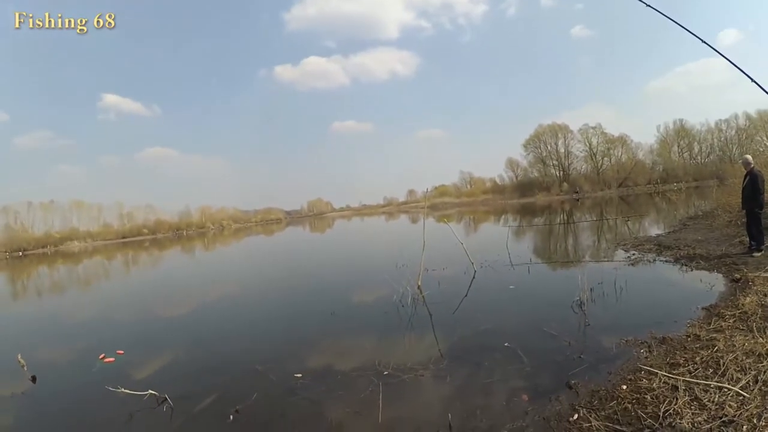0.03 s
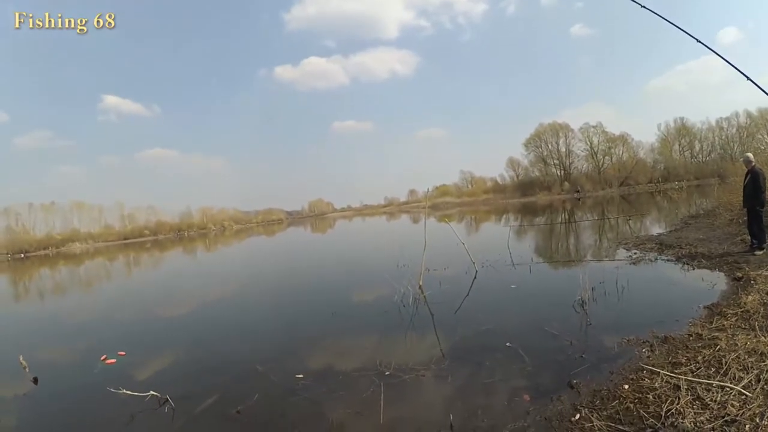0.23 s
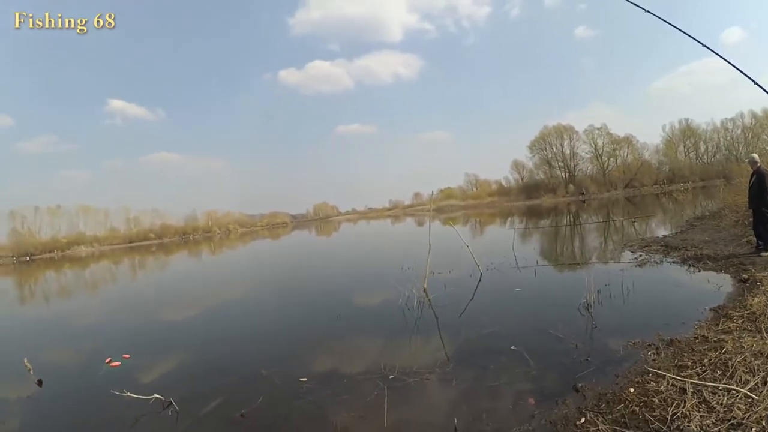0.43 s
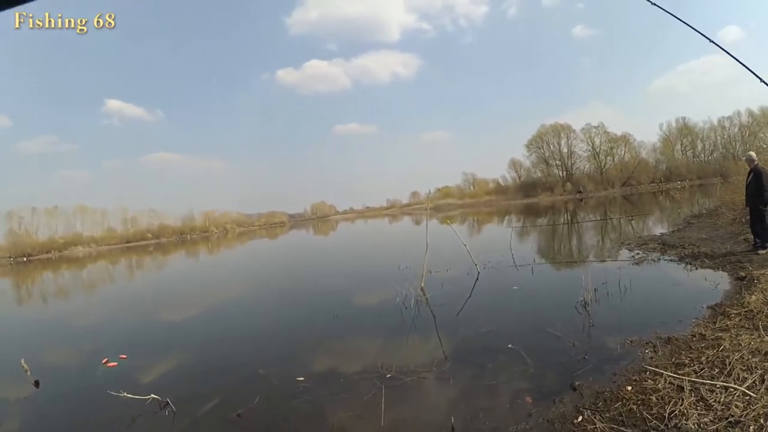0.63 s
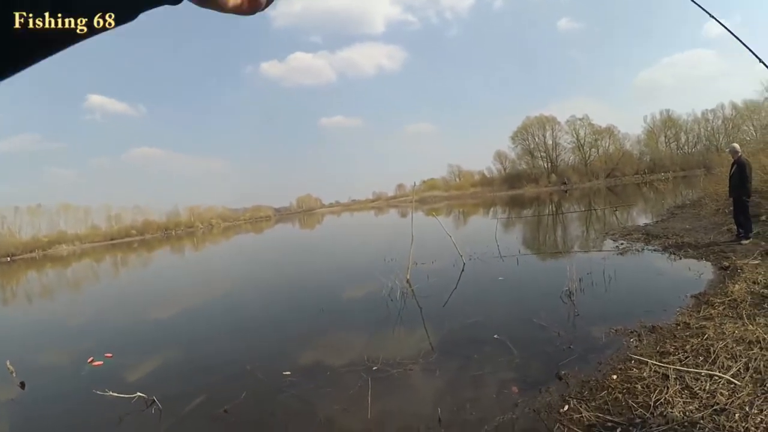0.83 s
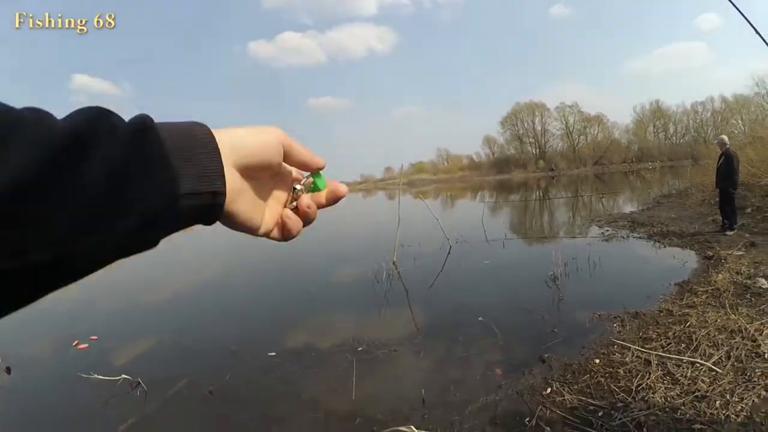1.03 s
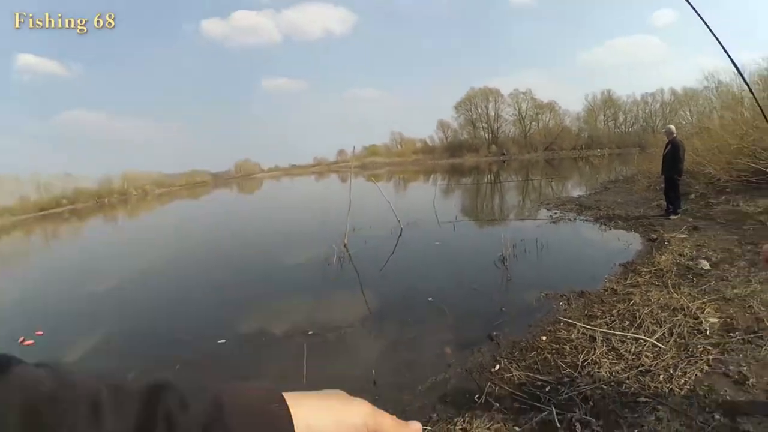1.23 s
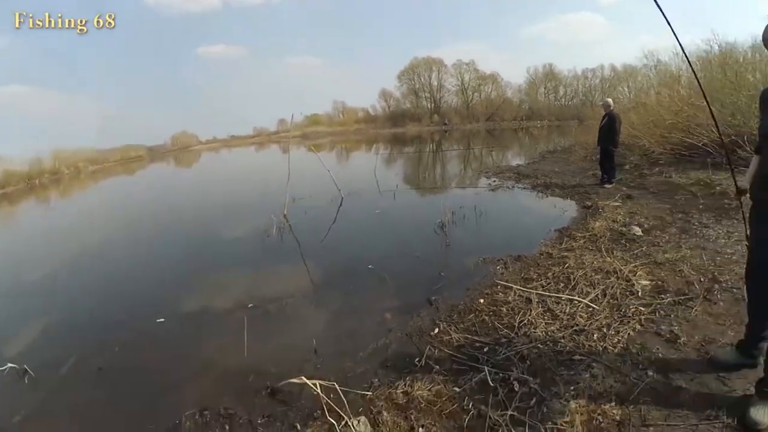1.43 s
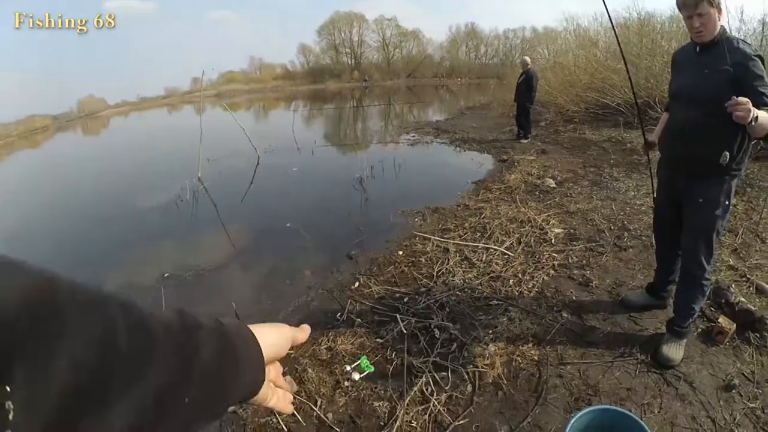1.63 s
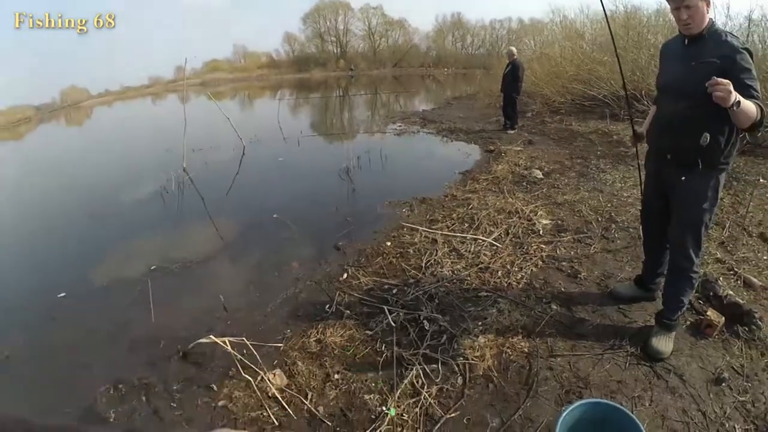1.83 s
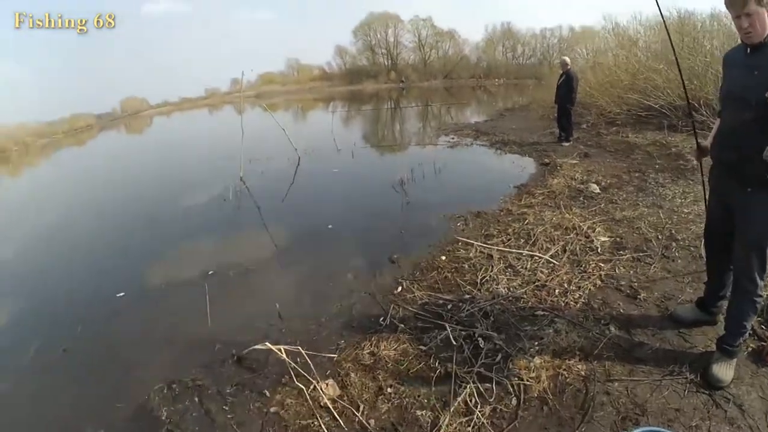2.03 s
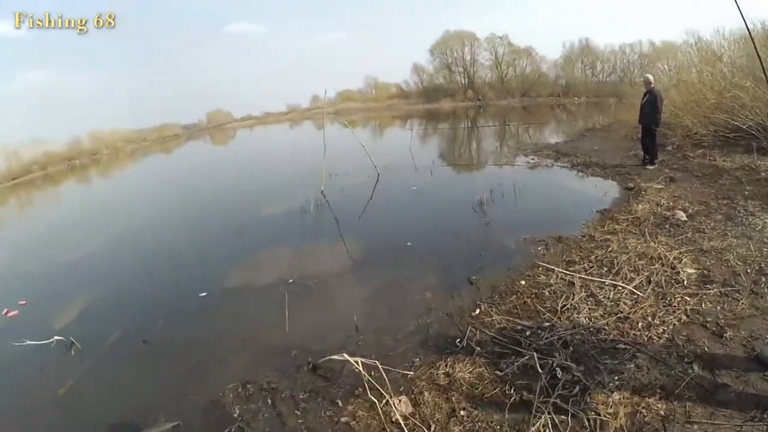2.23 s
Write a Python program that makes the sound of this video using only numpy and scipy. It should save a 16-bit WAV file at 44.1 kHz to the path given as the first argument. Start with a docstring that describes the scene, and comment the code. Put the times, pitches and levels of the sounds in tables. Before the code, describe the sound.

Bright metallic jingling comes from a little bell handled up close in a quiet outdoor spot. It rattles twice, its ring cut short by fingers, tinkles sparsely, then falls with a clack and a few last clinks.

```python
"""Twin fishing bell by a pond

A hand-held twin bell gives two shakes, a few loose tinkles, then a sharp clack as it drops.
Pellets excite the modes of two small shells, which also clack together; the fingers damp the ringing.
A sleeve scuffs, a faint swish rises and air nudges the microphone.
A regularly slipping sample clock modulates the sound, putting faint side tones around every ring."""
import sys
import numpy as np
from scipy import signal
from scipy.fft import rfft, irfft
from scipy.io import wavfile
from scipy.ndimage import uniform_filter1d, map_coordinates

SR = 44100
rng = np.random.default_rng(int(sys.argv[2]) if len(sys.argv) > 2 else 0)


def unload_audio(sound):
    """Save the sound as a 16-bit wav file, at the path given as the first command line argument."""
    columns = np.transpose(np.atleast_2d(sound))
    # keep every value between -1 and 1, then stretch to whole-number steps
    steps = np.round(np.clip(columns, -1, 1) * 32767)
    wavfile.write(sys.argv[1], SR, steps.astype(np.int16))


N = 101429

# Pellet strikes on the lower shell: start_s, ring_db, overtone_db
LOW_STRIKES = [(0.2166, -25.5, -38), (0.2234, -18.5, -39.5), (0.236, -45, -35), (0.25, -33.5, -27),
               (0.2662, -21, -26), (0.2814, -17.5, -22), (0.2965, -20.5, -24.5), (0.3567, -34, -27.5),
               (0.374, -39.5, -32), (0.414, -51, -43), (0.4827, -51.5, -46.5), (0.5, -69, -55),
               (0.881, -34.5, -40), (0.914, -46.5, -34), (0.931, -32.5, -34), (0.9437, -25, -36),
               (0.955, -30, -25.5), (1.0013, -43, -35.5), (1.021, -29.5, -45), (1.0305, -25, -41),
               (1.071, -34, -34), (1.094, -25, -35.5), (1.1167, -29.5, -45), (1.1714, -37, -50.5),
               (1.3459, -43, -45.5), (1.6317, -49.5, -43), (1.72, -41, -49), (1.8105, -51, -54.5),
               (1.8375, -61.0, -59.5), (1.9384, -49.5, -57.5), (2.06, -40.5, -48), (2.202, -51.5, -39),
               (2.2235, -41.5, -48.5), (2.2706, -44.0, -49.5)]
# Pellet taps inside the closed hand: start_s, level_db
MUFFLED_TAPS = [(0.0278, -33.5), (0.049, -42), (0.0908, -33), (0.0955, -44.5), (0.1122, -36.5),
                (0.1398, -35.5), (0.1651, -36.5), (0.1833, -50)]
LOW_HZ, LOW_OVERTONE_HZ = 3775, 9158
LOW_GAIN_DB, OVERTONE_GAIN_DB = 2, 1

def low_bell():
    """Impact excitation: a struck shell rings at its natural frequencies; gripped, it only taps."""
    starts, ring_db, overtone_db = np.array(LOW_STRIKES).T
    taps = shell_mode(*np.array(MUFFLED_TAPS).T, LOW_HZ)
    ring = shell_mode(starts, ring_db + LOW_GAIN_DB, LOW_HZ)
    overtone = shell_mode(starts, overtone_db + OVERTONE_GAIN_DB, LOW_OVERTONE_HZ, overtone=True)
    return taps + ring + overtone


# Pellet strikes on the higher shell: start_s, ring_db, overtone_db, overtone_hz
HIGH_STRIKES = [(0.2243, -30.5, -31.5, 10380), (0.2572, -34, -20.5, 10260), (0.2667, -42.5, -38, 10270),
                (0.2823, -21.5, -29.5, 10430), (0.2875, -22, -21.5, 10360), (0.2967, -22.5, -18.0, 10390),
                (0.3071, -30.5, -32, 10080), (0.725, -76.5, -49.5, 10350), (0.8671, -27, -45, 10560),
                (0.881, -30.5, -45, 10330), (0.9063, -29.5, -48, 10300), (0.9229, -26.5, -30.5, 10590),
                (0.9506, -26.5, -40, 10300), (0.9564, -20.5, -35.5, 10320), (0.979, -40, -38.5, 10610),
                (0.9934, -29, -42, 10600), (1.021, -39, -36, 10310), (1.0437, -24.5, -36, 10600),
                (1.0574, -29, -38.5, 10110), (1.074, -18.5, -47, 10130), (1.093, -25.0, -35, 10080),
                (1.1161, -61, -45.5, 10280), (1.149, -38.5, -50.5, 10160), (1.326, -45, -79, 10400),
                (1.3391, -37.5, -60, 10320), (1.3562, -27.5, -45.5, 10160), (1.6055, -44, -85, 10350),
                (1.649, -32, -50.5, 10080), (1.6907, -32.5, -55, 10510), (1.761, -48.5, -55, 10520),
                (1.8395, -43.5, -61, 10500), (1.949, -54, -54, 10220), (1.999, -67, -49.5, 10210),
                (2.058, -34.0, -39.5, 10260), (2.0751, -29, -47.5, 10030), (2.1333, -42.0, -55.5, 10160),
                (2.1717, -45.5, -41.5, 10570)]
# Strength of the twin mode, added to ring_db: time_s, offset_db
TWIN_BALANCE = [(.95, -14), (1.04, -6), (1.65, -21), (1.69, 0.5), (1.77, 2), (1.83, -15.5)]
HIGH_HZ, TWIN_HZ, HIGH_GAIN_DB = 4143, 3980, 1.5

def high_bell():
    """Beating: two nearby modes interfere. The point of impact selects one of a cluster of overtones."""
    starts, ring_db, overtone_db, overtone_hz = np.array(HIGH_STRIKES).T
    twin_db = ring_db + np.interp(starts, *np.array(TWIN_BALANCE).T)
    ring = shell_mode(starts, ring_db + HIGH_GAIN_DB, HIGH_HZ)
    twin = shell_mode(starts, twin_db, TWIN_HZ)
    overtone = shell_mode(starts, overtone_db + OVERTONE_GAIN_DB, overtone_hz, overtone=True)
    return ring + twin + overtone


# Decay time of the shells, short while gripped: time_s, t60_s
RING_DECAY = [(.17, 0.015), (.222, 0.062), (.285, .15), (.33, 0.1), (.39, 0.024), (.87, .15), (1.13, 0.096),
              (1.2, 0.03103), (1.34, .1), (1.375, 0.01986), (1.64, .12), (1.95, 0.21), (2.12, 0.11),
              (2.25, .15)]
OVERTONE_FREE_T60_S, OVERTONE_GRIP_SHARE = 0.091, 0.25
GRIP_SHARPEN_S = 0.0005  # times the grip gives the fractional rise in pitch
RATTLE_HZ, RING_RATTLE_DB, OVERTONE_RATTLE_DB = 150, -19, -11
DETUNE, JOLT_RAD, CONTACT_S = 0.0018, 1.58, 0.00045

def shell_mode(starts, levels_db, hz, overtone=False):
    """Damped oscillator, restarted by each strike. Fingers damp and sharpen it; the pellet buzzes on it."""
    t = np.arange(N) / SR
    grip = (OVERTONE_GRIP_SHARE if overtone else 1) / np.interp(t, *np.array(RING_DECAY).T)
    damping = np.log(1000) * (grip + (1 / OVERTONE_FREE_T60_S if overtone else 0))
    lengths = np.maximum(np.diff(np.append(starts, N / SR)), 1 / SR)
    pitches = hz * np.ones(len(starts))
    buzz = butterworth(rng.standard_normal(N) + 1j * rng.standard_normal(N), 2, RATTLE_HZ)
    rattle = 1 + undb(OVERTONE_RATTLE_DB if overtone else RING_RATTLE_DB) * buzz / buzz.std()
    scatter = rng.standard_normal((len(starts), 2))
    out, state = np.zeros(N), 0j
    for start, length, size, pitch, (pull, jolt) in zip(starts, lengths, undb(levels_db), pitches, scatter):
        span = slice(int(start * SR), int((start + length + CONTACT_S) * SR) + 1)
        pole = 2j * np.pi * pitch * (1 + DETUNE * pull + GRIP_SHARPEN_S * grip[span]) - damping[span]
        # The stronger the strike against the remaining vibration, the more it jolts the phase.
        phase = np.angle(state) + JOLT_RAD * jolt * size / (size + abs(state))
        phasor = size * np.exp(1j * phase + np.cumsum(pole) / SR)
        elapsed = t[:len(pole)]
        rise = np.clip(elapsed / CONTACT_S, 0, 1)
        release = np.clip(1 + (length - elapsed) / CONTACT_S, 0, 1)
        add(out, start, (phasor * rattle[span]).imag * rise * release)
        state = phasor[min(int(length * SR), len(phasor) - 1)]
    return out


# Collisions of shells and clip: start_s, level_db
COLLISIONS = [(0.2164, -24.5), (0.2234, -14), (0.2363, -25.5), (0.248, -20), (0.2502, -19.5), (0.2625, -23),
              (0.268, -26.5), (0.282, -13), (0.2862, -19.0), (0.2946, -23.5), (0.3056, -23.5), (0.348, -29),
              (0.3575, -30), (0.3745, -31), (0.394, -33.5), (0.4128, -32), (0.43, -44), (0.449, -44),
              (0.4821, -33.5), (0.4955, -40), (0.8675, -28), (0.8797, -26), (0.9065, -27), (0.937, -24),
              (0.939, -28), (0.9428, -15.5), (0.9504, -25), (0.9555, -31), (1.0037, -24), (1.0595, -24),
              (1.0809, -19), (1.096, -28), (1.1022, -25), (1.171, -35), (1.354, -30), (1.3624, -34.0),
              (1.4255, -45), (1.591, -41), (1.8109, -41.5), (2.0207, -35.5), (2.037, -29), (2.0748, -43),
              (2.0858, -31.5), (2.1326, -31.5), (2.172, -40)]
BOUNCE_SPREAD_S, BOUNCE_DB, BOUNCE_SPREAD_DB = 0.009, -14.5, 1.5
TAP_CLICK_DB, TICKS_PER_S, TICK_DB, TICK_SPREAD_DB = -9.5, 44, -55, 2

def contacts():
    """Inelastic impact: collisions rebound weakly; pellets tap and tick. Returns start_s, level_db."""
    hits = list(COLLISIONS) + [(start, db + TAP_CLICK_DB) for start, db in MUFFLED_TAPS]
    for (start, db), bounces in zip(COLLISIONS, rng.standard_normal((len(COLLISIONS), 2, 2))):
        for wait, force in bounces:
            hits.append((start + BOUNCE_SPREAD_S * abs(wait), db + BOUNCE_DB + BOUNCE_SPREAD_DB * force))
    ticks = rng.random((300, 2))[:int(TICKS_PER_S * N / SR)]
    for when, chance in ticks:
        hits.append((when * N / SR, TICK_DB + TICK_SPREAD_DB * min(-np.log(chance), 3)))
    return hits


# Modes of a clack: pitch_hz, level_db, t60_s
CLACK_MODES = [(4413, -5.5, 0.045), (4830, 0.5, 0.015), (5420, -3, .007), (9460, -16.5, 0.035),
               (10370, -15, 0.057)]
# Noise spectrum of a contact: frequency_hz, density_db
CRACK_SPECTRUM = [(200, -29), (1200, -28.5), (3000, -12.5), (4700, 6.5), (6500, 0.5), (8200, -0.5),
                  (11500, -14.5), (15000, -18)]
CRACK_DB, CRACK_T60_S, CHATTER_DB, CHATTER_T60_S = -5.5, 0.0066, -28.5, 0.035
CLACK_SCATTER_HZ, CLACK_CUT_HZ = 140, 2500
RING_THRESHOLD_DB = -48.5  # lighter contacts mostly click, with little ring

def clacks():
    """Transient response: each brief contact gives a broadband crack and a few heavily damped modes."""
    knock, crack = np.zeros(N), np.zeros(N)
    t = np.arange(SR // 20) / SR
    burst = undb(CRACK_DB) * fade(t, CRACK_T60_S) + undb(CHATTER_DB) * fade(t, CHATTER_T60_S)
    rise = np.minimum(t / CONTACT_S, 1)
    grit = noise(CRACK_SPECTRUM)
    hits = contacts()
    for (start, db), pulls in zip(hits, rng.standard_normal((len(hits), len(CLACK_MODES)))):
        ring = sum(undb(mode_db) * fade(t, t60) * np.sin(2 * np.pi * (hz + CLACK_SCATTER_HZ * pull) * t)
                   for (hz, mode_db, t60), pull in zip(CLACK_MODES, pulls))
        add(knock, start, undb(db) / (1 + undb(RING_THRESHOLD_DB - db)) * ring * rise)
        add(crack, start, undb(db) * burst * rise)
    return butterworth(knock, 1, CLACK_CUT_HZ, "high") + crack * grit


# Modes of the dropped bell: pitch_hz, level_db, t60_s
DROP_MODES = [(4987, -1.5, 0.027), (4310, -6.5, 0.012), (6320, -10.5, 0.009), (7500, -3.5, 0.009),
              (8120, -8, 0.0059), (12390, -7.5, 0.0098)]

def drop(start_s=2.0462, push_s=0.001257, ring_db=-19.5, tap_db=-28.5):
    """Heavy damping: modes build during one hard impact and die at once, over a short pressure pulse."""
    t, after = age(start_s), age(start_s + push_s)
    ring = sum(undb(db) * fade(after, t60) * np.sin(2 * np.pi * hz * t) for hz, db, t60 in DROP_MODES)
    tap = after * SR / 4 * np.exp(1 - after * SR / 4)  # peaks four samples after the push
    return undb(ring_db) * ring * np.minimum(t / push_s, 1) + undb(tap_db) * tap


# Rubs of hand and sleeve: start_s, length_s, level_db
SCUFFS = [(0.662, 0.021, -50), (0.7, 0.019, -50), (0.791, 0.013, -51.5), (0.829, 0.017, -52.5),
          (2.005, 0.18, -50), (2.238, 0.022, -43.5)]
# Noise spectrum of rubbing: frequency_hz, density_db
SCUFF_SPECTRUM = [(300, -22), (1500, -9.5), (3000, -3), (5000, 3.5), (9000, -1.5), (15000, -16.5)]

def scuffs():
    """Sliding friction: each rub is grainy noise that swells and stops."""
    swell = sum(undb(db) * arch(start, length) for start, length, db in SCUFFS)
    grain = uniform_filter1d(rng.exponential(size=N) ** 4, size=40)
    return swell * np.sqrt(np.abs(grain) / grain.mean()) * noise(SCUFF_SPECTRUM)


def swish(start_s=0.31, length_s=0.35, pitch_hz=1180, rise_hz_per_s=510, flutter_hz=88, level_db=-67.5):
    """Narrowband noise: a faint rising whistle, perhaps a distant fishing line cutting the air."""
    flutter = butterworth(rng.standard_normal((2, N)), 2, flutter_hz)
    phase = 2 * np.pi * np.cumsum(pitch_hz + rise_hz_per_s * age(start_s)) / SR
    whistle = flutter[0] * np.sin(phase) + flutter[1] * np.cos(phase)
    return undb(level_db) * arch(start_s, length_s) * whistle / whistle.std()


def puff(centre_s=1.532, width_s=0.0065, push_db=-28.5, flutter_db=-43.5, flutter_hz=170):
    """Pressure pulse: moving air pushes once on the microphone and flutters briefly."""
    offset = (np.arange(N) / SR - centre_s) / width_s
    push = (1 - offset ** 2) * np.exp(-.5 * offset ** 2)
    flutter = butterworth(rng.standard_normal(N), 3, flutter_hz)
    swell = np.exp(-.5 * (offset / 2) ** 2)
    return undb(push_db) * push + undb(flutter_db) * swell * flutter / flutter.std()


# Noise spectrum of open air: frequency_hz, density_db
AIR_SPECTRUM = [(8, 9), (38, 3.5), (90, -20), (300, -24), (1300, -35), (4800, -34.5), (8000, -40.5),
                (15000, -48.5)]

def air(level_db=-51, side_db=-17):
    """Ambient noise: low rumble and faint hiss, widened by a weak part in antiphase between channels."""
    mid = noise(AIR_SPECTRUM)
    side = undb(side_db) * noise(AIR_SPECTRUM) * np.array([[1], [-1]])
    return undb(level_db) * (mid + side)


def undb(db):
    """Decibels to amplitude ratio."""
    return 10 ** (np.asarray(db) / 20)


def noise(spectrum):
    """Spectral shaping: noise of unit rms from rows of frequency_hz, density_db."""
    hz, db = np.array(spectrum).T
    bins_hz = np.maximum(np.fft.rfftfreq(N, 1 / SR), 1)
    gain = undb(np.interp(np.log(bins_hz), np.log(hz), db))
    shaped = irfft(rfft(rng.standard_normal(N)) * gain, N)
    return shaped / shaped.std()


def butterworth(sound, order, cutoff_hz, kind="low"):
    """Maximally flat filter."""
    return signal.sosfilt(signal.butter(order, cutoff_hz, kind, fs=SR, output="sos"), sound)


def age(start_s):
    """Seconds since an onset, zero before it."""
    return np.maximum(np.arange(N) / SR - start_s, 0)


def arch(start_s, length_s):
    """Half-sine envelope."""
    return np.sin(np.pi * np.minimum(age(start_s) / length_s, 1))


def fade(t, t60):
    """Exponential decay, 60 dB in t60."""
    return np.exp(-np.log(1000) * t / t60)


def add(out, start_s, sound):
    """Superposition: mix a short sound in at its onset."""
    i = min(int(start_s * SR), N)
    out[i:i + len(sound)] += sound[:N - i]


def scene(shell_cut_hz=3030):
    """Direct sound: the bell is close, dry and central. Small shells radiate little bass."""
    shells = butterworth(low_bell() + high_bell(), 3, shell_cut_hz, "high")
    return shells + drop() + scuffs() + clacks() + swish() + puff() + air()


def record(dry, slip_hz=1152, top_hz=15600):
    """Phase modulation: the clock drifts one sample and slips back, making sidebands. The top is cut."""
    n = np.arange(N)
    position = n + (n * slip_hz / SR) % 1 - .5
    slipped = np.array([map_coordinates(channel, [position], order=5, mode="mirror") for channel in dry])
    return signal.sosfilt(signal.ellip(8, .2, 70, top_hz, fs=SR, output="sos"), slipped)


dry = scene()
out = record(dry)
unload_audio(out)
```